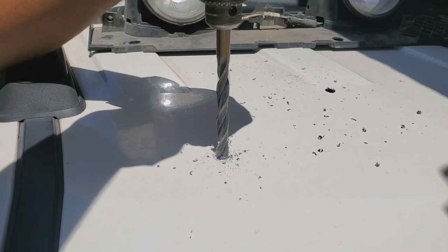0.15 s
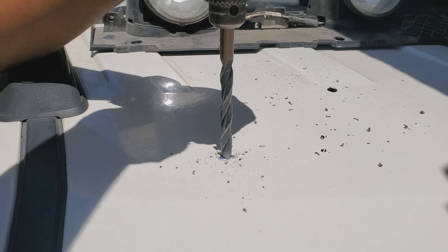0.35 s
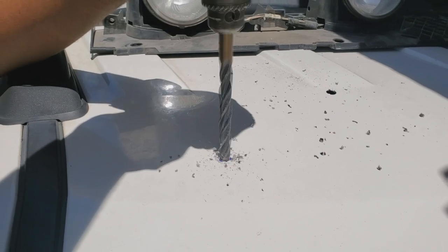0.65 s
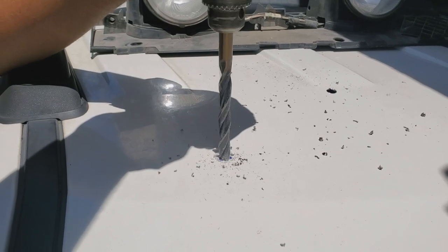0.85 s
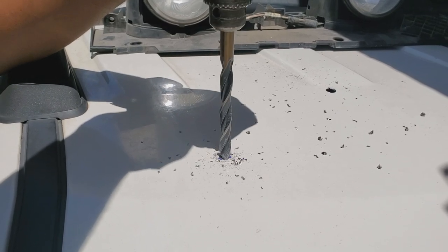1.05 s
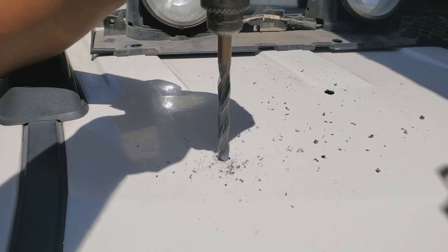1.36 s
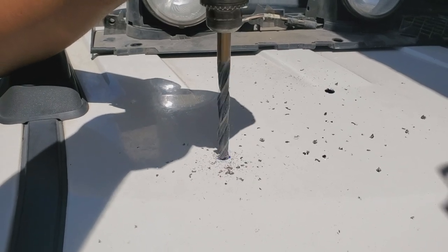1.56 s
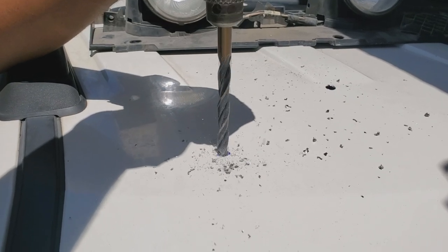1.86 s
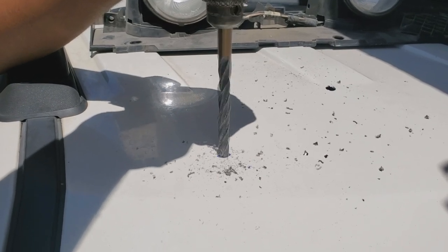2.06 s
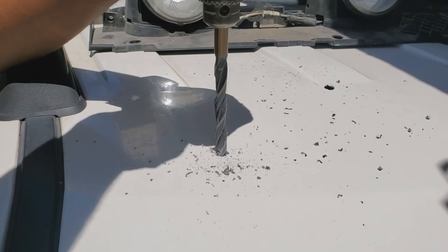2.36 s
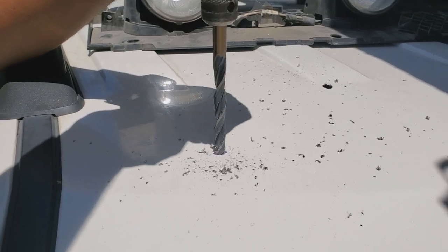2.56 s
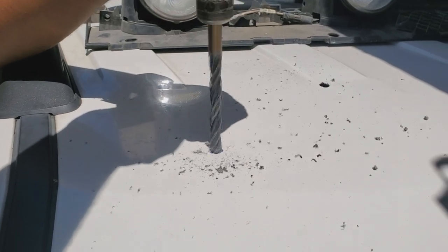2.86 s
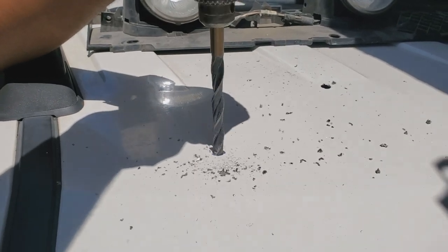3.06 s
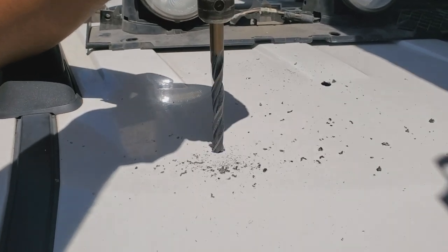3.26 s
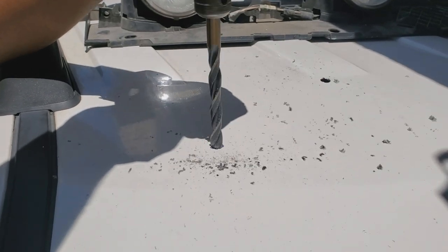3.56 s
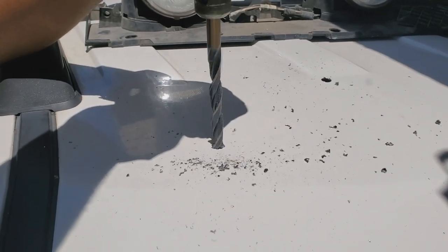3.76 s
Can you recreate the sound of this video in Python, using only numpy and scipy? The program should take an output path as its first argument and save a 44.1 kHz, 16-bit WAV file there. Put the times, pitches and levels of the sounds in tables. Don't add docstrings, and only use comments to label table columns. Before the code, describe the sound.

Close, dry outdoor stereo: a cordless drill bites thin sheet steel in seven bursts starting near 0.05, 0.64, 1.2, 1.75, 2.3, 2.8 and 3.4 s. Each revs up briefly, then coasts down, mixing gear whine, shrill bit squeal around 3 kHz, gritty crunch, fan hiss and panel drumming. Chips and trigger tick in the quiet gaps; a faint electronic chirp at 1.1 s. The last pull runs longest and fastest.

```python
import sys
import numpy as np
from scipy import signal
from scipy.fft import rfft, irfft, next_fast_len
from scipy.io import wavfile
from scipy.ndimage import uniform_filter1d, map_coordinates

SR = 44100
rng = np.random.default_rng(int(sys.argv[2]) if len(sys.argv) > 2 else 0)


def volts_from_db(level):
    exponent = np.asarray(level, float) / 20
    return 10 ** exponent


def log_audio(samples):
    frames = np.atleast_2d(samples).T
    limited = np.clip(frames, -1, 1)
    pcm = np.round(limited * 32767).astype(np.int16)
    wavfile.write(sys.argv[1], SR, pcm)


N = 171990


def unit(x):
    return x / np.sqrt(np.mean(x ** 2) + 1e-20)


def along(points, hz):
    point_hz, value = np.transpose(points)
    return np.interp(np.log(hz + 1), np.log(point_hz + 1), value)


def wobble(rate):
    knots = rng.standard_normal(int(N * rate / SR) + 4)
    return map_coordinates(knots, [np.arange(N) * rate / SR])


def filtered(x, response):
    m = next_fast_len(N + SR // 2)
    return irfft(rfft(x, m) * response(np.fft.rfftfreq(m, 1 / SR)), m)[..., :N]


def colour(points):
    return lambda hz: volts_from_db(along(points + [(SR / 2, -60)], hz))


def ringing(modes):
    def response(hz):
        total = 0
        for k, (centre, width, db) in enumerate(modes):
            damping = 1j * hz * width
            total = total + (-1) ** k * volts_from_db(db) * damping / (centre * centre - hz * hz + damping)
        return total
    return response


def tone(hz, blur_hz, unsteady_db):
    versions = []
    for _ in range(2):
        level = volts_from_db(unsteady_db * wobble(60))
        phase = 2 * np.pi * np.cumsum(hz + blur_hz * wobble(150)) / SR
        versions.append(level * np.sin(phase))
    return np.array(versions)


# pitch_hz, level_db (per Hz)
YARD_SPECTRUM = [(20, -17), (60, 9), (300, -15), (1500, -20), (5000, -20), (7200, -39), (10000, -34),
                 (15000, -40)]


def yard():
    return volts_from_db(-41.5) * unit(filtered(rng.standard_normal((2, N)), colour(YARD_SPECTRUM)))


# start_s, level_db (peak)
TICK_EVENTS = [(0.034, -31.5), (0.4853, -48), (0.5024, -55), (0.5741, -37), (0.616, -30.5), (1.0355, -46),
               (1.0614, -50), (1.1917, -30), (1.6788, -32), (1.736, -26.5), (2.2452, -36), (2.2503, -39),
               (2.2768, -26), (2.8025, -22.5)]
# pitch_hz, level_db (per Hz)
TICK_SPECTRUM = [(1500, -25), (3500, 0), (9000, -3), (15000, -6)]


def ticks():
    t60_s, rise_s = .02, .0003
    out, t = np.zeros((2, N + SR)), np.arange(1500) / SR
    for start_s, level_db in TICK_EVENTS:
        puff = volts_from_db(level_db - 60 * t / t60_s) * (1 - np.exp(-t / rise_s))
        start = round(start_s * SR)
        out[:, start:start + len(t)] += puff * rng.standard_normal((2, len(t)))
    return filtered(out[:, :N], colour(TICK_SPECTRUM))


USUAL_HZ = 1200
PULL_STARTS = [0.042, .639, 1.193, 1.755, 2.293, 2.799, 3.378]
# release_s, mesh_hz (then), squeal_db, panel_db, whine_db
PULL_ENDS = [(.185, 1157, -13.5, -23, -27), (.775, 1130, -15, -20.5, -27), (1.351, 1202, -14.5, -17.5, -29),
             (1.916, 1243, -15, -19, -26), (2.45, 1231, -17, -17.5, -27.5), (3.012, 1395, -18, -18.5, -29),
             (3.679, 1503, -21.5, -21, -32.5)]


def motor():
    free_hz, spin_up_s, coast_hz_per_s = 1598.6, .118, 3530
    creep_hz, round_hz = 110.6, 29.77
    kick, kick_s = 0.1, .03
    t = np.arange(N) / SR
    on = np.c_[PULL_STARTS]
    off, peak_hz = np.transpose(PULL_ENDS)[:2, :, None]
    up = free_hz - (free_hz - peak_hz) * np.exp(np.clip((off - t) / spin_up_s, -9, 9))
    down = creep_hz * np.logaddexp(0, (peak_hz - coast_hz_per_s * (t - off)) / creep_hz)
    each = -round_hz * np.logaddexp(-up / round_hz, -down / round_hz) * (t > on)
    mesh = np.maximum(each.max(axis=0), 1)
    pull = np.maximum((t > on).sum(axis=0) - 1, 0)
    slack = kick * (t > on[0]) * np.exp(-np.abs(t - on[pull, 0]) / kick_s)
    speed = uniform_filter1d(np.hypot(mesh / USUAL_HZ, slack), size=220)
    return mesh, speed, pull


def chips(speed):
    per_s, spread_db = 4000, 2
    chance = np.clip(per_s / SR * (speed + .15), 0, 1)
    sizes = volts_from_db(spread_db * rng.exponential(size=(2, N))) * rng.standard_normal((2, N))
    return sizes * (rng.random((2, N)) < chance) / np.sqrt(chance)


# multiple, level_db
GEAR_TONES = [(1, -27), (2, -21), (3, -23)]
PULL_TEETH = [2, 1, -4.5, -6, -7, -6.5, -10]
# pitch_hz, level_db
HOUSING_PASS = [(500, -8), (1200, 0), (2000, -1), (2850, 2), (3150, 13), (3600, 14), (3900, -2),
                (4500, -12)]


def gears(mesh, speed, pull):
    teeth = sum(volts_from_db(db) * tone(k * mesh, k * 11, unsteady_db=2.5) for k, db in GEAR_TONES)
    return filtered(teeth * volts_from_db(np.take(PULL_TEETH, pull)) * speed ** 2.4, colour(HOUSING_PASS))


# multiple, level_db
CARRIER_TONES = [(1, -44), (2, -29), (3, -35), (4, -34)]


def carrier(mesh, speed):
    carrier_hz = .039 * mesh
    hum = sum(volts_from_db(db + 3 * wobble(6)) * tone(k * carrier_hz, 5, unsteady_db=1) for k, db in CARRIER_TONES)
    return speed ** 2 * hum


def slot_whine(mesh, speed, whine_db):
    return volts_from_db(whine_db) * speed ** 4.5 * tone(6.8 * mesh, 65, unsteady_db=3.5)


# pitch_hz, width_hz, level_db
BIT_MODES = [(2187, 600, -17), (3074, 302, -3), (3188, 173, -1), (3524, 78, -4), (4880, 510, -14)]


def squeal(speed, squeal_db, bite_db):
    quiet_below = 0.18
    rubbing = speed ** 1.02 / (1 + (quiet_below / speed) ** 4)
    ring = unit(filtered(chips(speed), ringing(BIT_MODES)))
    return volts_from_db(squeal_db + bite_db + wobble(25.25)) * rubbing * ring


# pitch_hz, level_db (per Hz)
GRIT_SPECTRUM = [(25, -24), (55, -14.5), (150, -16), (900, -8), (1450, -14.5), (2200, -9.5), (4000, -6),
                 (6400, -34.5)]


def grit(speed, feed_db, bite_db):
    crunch = unit(filtered(chips(speed), colour(GRIT_SPECTRUM)))
    return volts_from_db(-19.5 + feed_db + bite_db) * speed ** 1.15 * crunch


# pitch_hz, level_db (per Hz)
FAN_SPECTRUM = [(5500, 0), (6560, -2), (8240, -4.5), (9600, -9.5), (10500, 1), (12400, -2), (13900, -2),
                (15700, -6.5)]


def fan(speed, feed_db, bite_db):
    rough = rng.standard_normal((2, N)) + 0.94 * unit(chips(speed))
    air = unit(filtered(rough, colour([(3500, -10)] + FAN_SPECTRUM)))
    return volts_from_db(-24.5 + 0.72 * feed_db + 1.16 * bite_db) * speed ** 1.61 * air


# pitch_hz, width_hz, level_db
PANEL_MODES = [(88.8, 5.9, 0), (127.4, 6.8, -4), (177.4, 6.4, -1), (210, 7, 0.5), (240, 6.4, 0.5),
               (272, 4.06, 3.5), (325, 42, -10.5), (392.3, 18.8, -4.5), (418, 28.4, 1.5), (445.6, 90, -6.5),
               (534.6, 35, -7), (659, 56, -18), (733, 26, -12.5), (910, 100, -16)]


def panel(speed, panel_db, bite_db):
    push = volts_from_db(panel_db + bite_db + 0.68 * wobble(25.04)) * speed ** 0.84 * chips(speed)
    plain = filtered(chips(speed), ringing(PANEL_MODES))
    return filtered(push, ringing(PANEL_MODES)) / np.std(plain)


PULL_BITE = [-3.5, -0.81, 1, 1, 1, 0.099, -0.18]


def drill():
    mesh, speed, pull = motor()
    squeal_db, panel_db, whine_db = np.transpose(PULL_ENDS)[2:, pull]
    feed_db = np.take(PULL_BITE, pull)
    bite_db = .5 * wobble(9) + .9 * wobble(35)
    machine = gears(mesh, speed, pull) + carrier(mesh, speed) + slot_whine(mesh, speed, whine_db)
    cut = squeal(speed, squeal_db, bite_db) + grit(speed, feed_db, bite_db)
    return machine + cut + fan(speed, feed_db, bite_db) + panel(speed, panel_db, bite_db)


def coils():
    start_s, period_s, length_s = 1.113, .0335, .075
    top_hz, bend, level_db, fade_db_per_s = 10600, 1.4, -32, 150
    t = np.arange(N) / SR - start_s
    hz = top_hz * np.abs(1 - 2 * (t / period_s % 1)) ** bend
    level = volts_from_db(level_db - fade_db_per_s * np.clip(t, 0, 1)) * (t > 0) * (t < length_s)
    level = level * np.clip(hz / 3500, 0, 1)
    return level * tone(hz, 60, unsteady_db=1.5)


# pitch_hz, likeness (0 to 1)
PORT_LIKENESS = [(40, .2), (90, .65), (200, .92), (700, .78), (1200, .35), (3270, .9), (4800, .45),
                 (12000, .45)]
# pitch_hz, lead_radians
PORT_LEAD = [(100, 0), (900, .4), (1890, 1.3), (2840, 2.5), (3400, 1.6), (4570, 2.4), (6460, 2), (15000, 2)]
# pitch_hz, level_db
PORT_TILT = [(30, 8), (110, 2), (200, 0), (380, 1.5), (1290, -.5), (7000, 0), (10500, 4), (13000, -6)]


def microphone(both):
    def shares(hz):
        turn = np.arccos(np.clip(along(PORT_LIKENESS, hz), 0, 1)) / 2
        return np.array([np.cos(turn), np.sin(turn)])

    def ports(hz):
        left = volts_from_db(along(PORT_TILT, hz) / 2) * np.exp(.5j * along(PORT_LEAD, hz))
        return np.array([left, 1 / left])

    same, other = filtered(both, shares)
    return filtered(np.array([same + other, same - other]), ports)


def scene():
    return microphone(yard() + ticks() + drill() + coils())


def low_pass(x):
    return signal.sosfilt(signal.butter(12, 15850, fs=SR, output="sos"), x)


def record(dry):
    x = filtered(dry, lambda hz: hz < 15760)
    mix = x / (1 + np.abs(x) ** 8) ** (1 / 8)
    return low_pass(mix)


dry = scene()
out = record(dry)
log_audio(out)
```